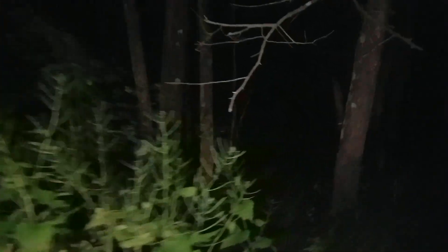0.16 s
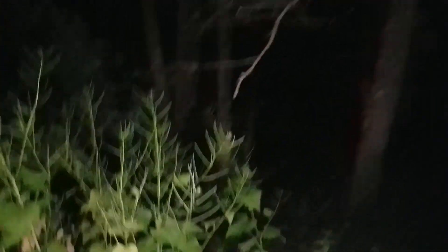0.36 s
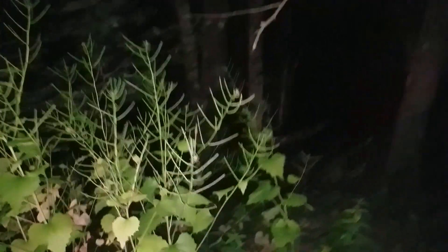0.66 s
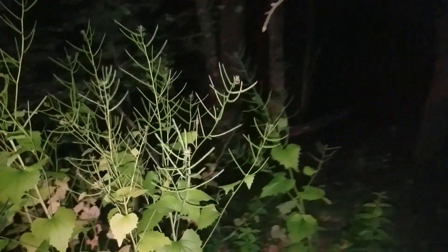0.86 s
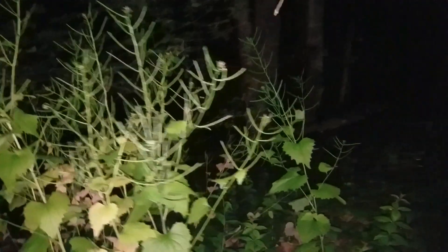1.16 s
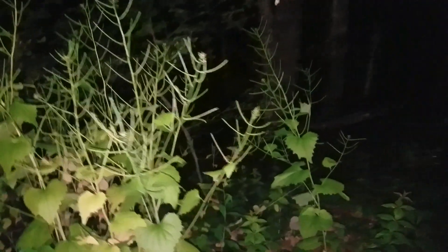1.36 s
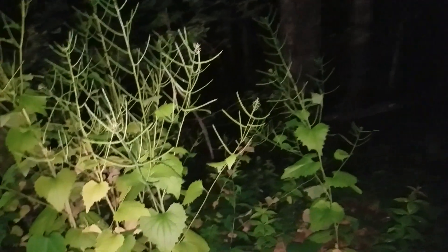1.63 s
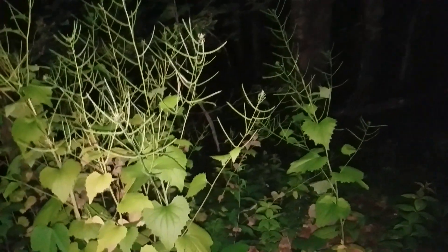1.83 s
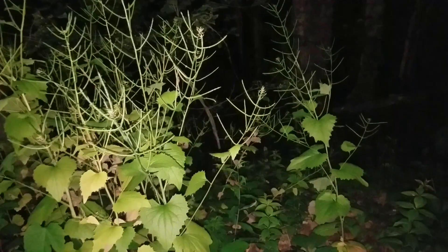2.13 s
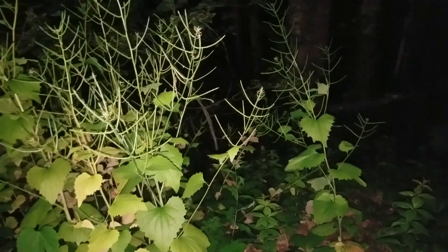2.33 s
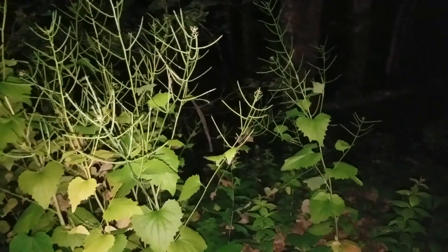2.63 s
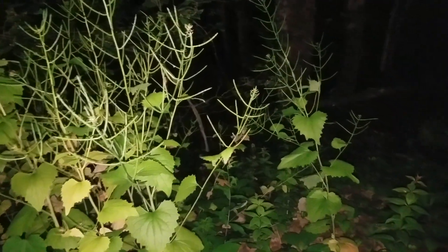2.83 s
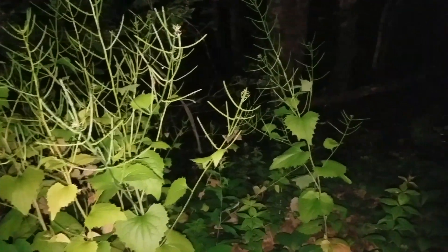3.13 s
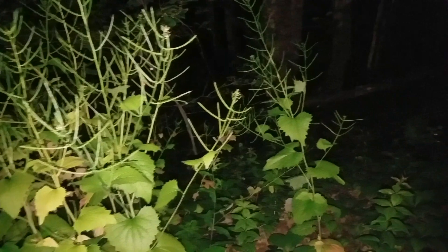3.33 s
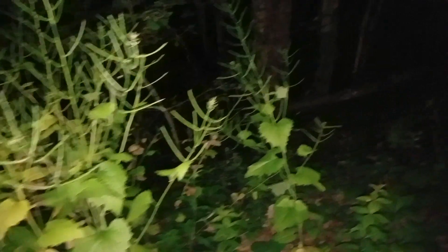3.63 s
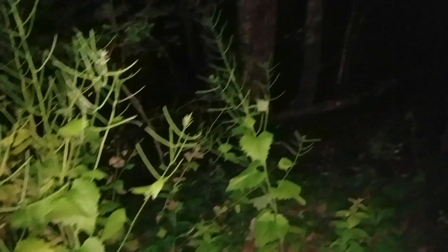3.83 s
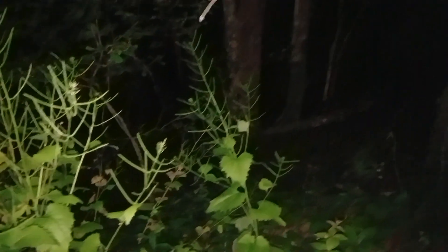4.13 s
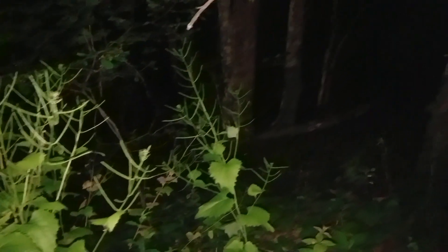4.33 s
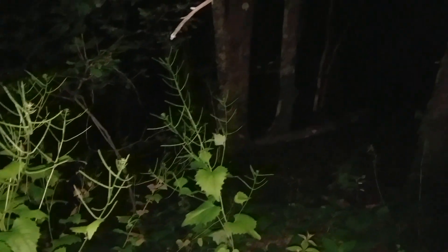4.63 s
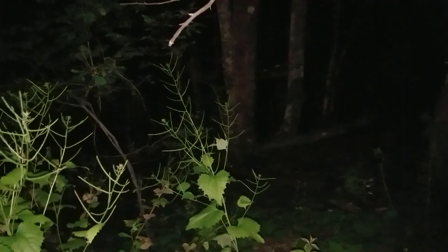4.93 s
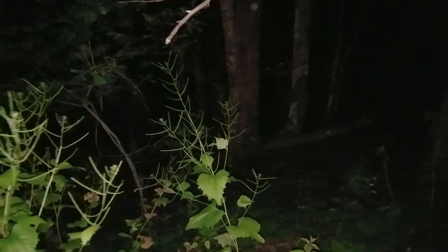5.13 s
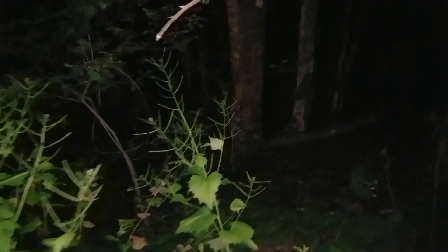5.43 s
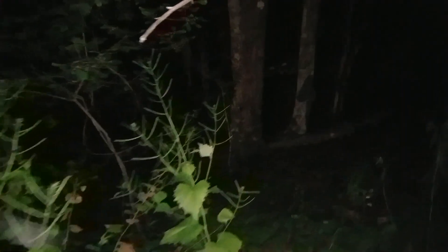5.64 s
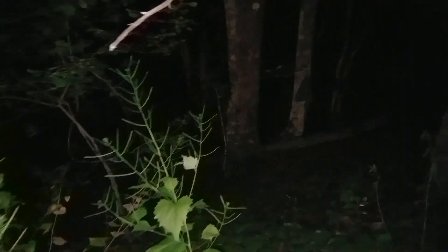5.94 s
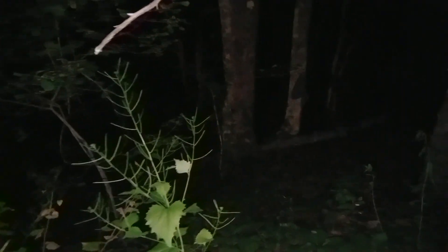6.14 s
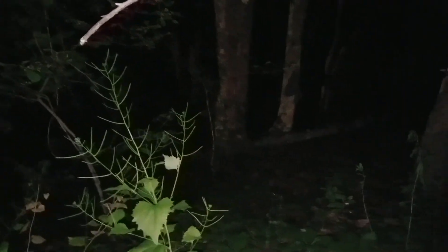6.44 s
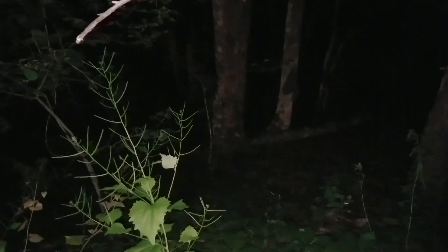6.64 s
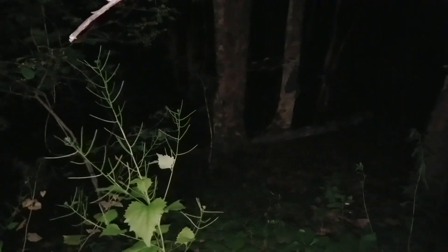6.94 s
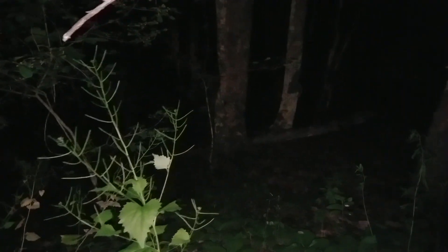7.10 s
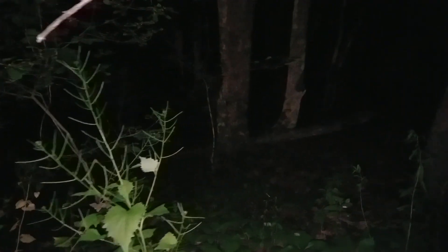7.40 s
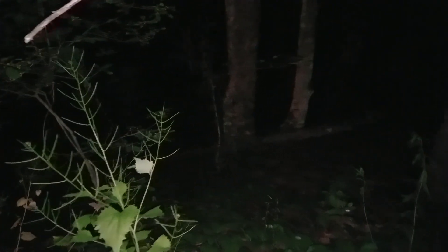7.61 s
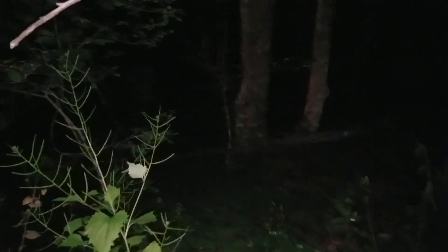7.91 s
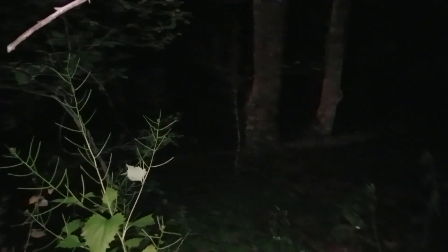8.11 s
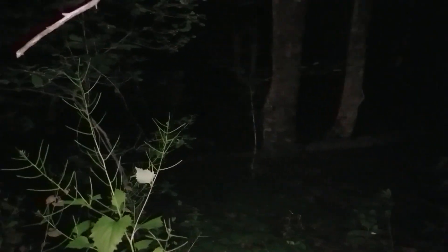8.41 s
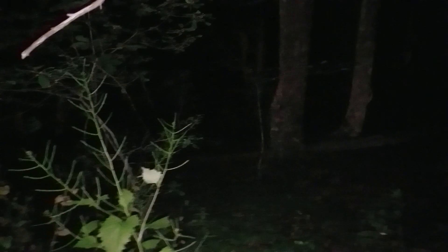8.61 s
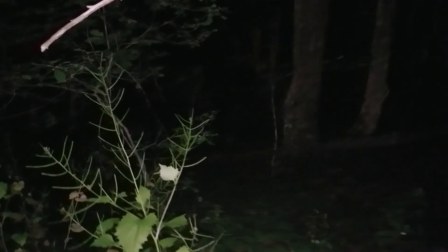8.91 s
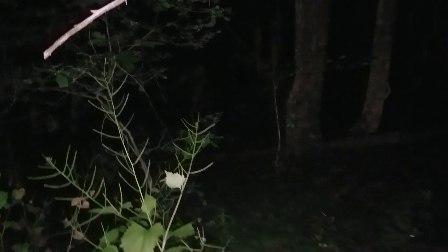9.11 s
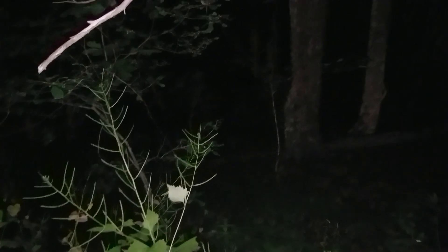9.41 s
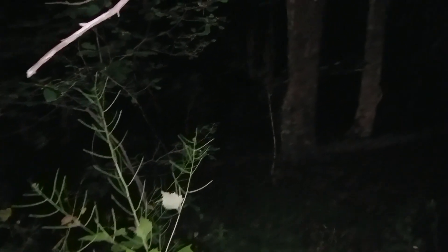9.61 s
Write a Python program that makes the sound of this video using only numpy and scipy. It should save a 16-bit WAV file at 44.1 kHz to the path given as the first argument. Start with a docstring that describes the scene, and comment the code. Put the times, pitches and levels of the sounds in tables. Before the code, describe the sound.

In a wood at night, several tree frogs trade brief pulsing trills that overlap and leave a long echo. Close to the hand-held microphone, leaves rustle, feet shift and twigs crack, mainly near the start, and a distant motor hums faintly. A light tap and then a sharp knock hit the microphone around the middle. Through the second half far traffic grows louder, its tyres singing a sinking note beneath the frogs.

```python
"""From the start, tree frogs trill over one another in a night wood, mostly to the right. Each trill
is a run of short rising notes that ring the frog's vocal sac, and tree trunks scatter a long echo.
In the first two seconds feet shuffle, leaves rustle and twigs snap, over a far motor's drone.
Something taps the hand-held microphone at 4.2 s and, much harder, at 5.6 s. From about 5 s to the
end, far traffic swells and its tyres sing a falling note, while the frogs and rustling go on."""
import sys
import numpy as np
from scipy import signal
from scipy.fft import rfft, irfft, next_fast_len
from scipy.io import wavfile

SR = 44100
rng = np.random.default_rng(int(sys.argv[2]) if len(sys.argv) > 2 else 0)


def wav_record(signal):
    """Record a signal, one row per channel, as 16-bit PCM in the file named by sys.argv[1]."""
    frames = np.transpose(np.atleast_2d(signal))
    bounded = np.clip(frames, -1, 1)
    # unit amplitude maps onto the largest positive 16-bit level
    quanta = np.round(bounded * 32767).astype(np.int16)
    wavfile.write(sys.argv[1], SR, quanta)


N = 430416
T = np.arange(N) / SR

# One frog trill a row: first_note_s, last_note_s, note_count, pitch_hz, level_db, voice
FROG_TRILLS = [ (-.022, 0.424, 10, 1089, -20, "high"), (.223, .727, 12, 1025, -21.5, "middle"),
               (0.466, 1.019, 14, 1178, -27, "high"), (.664, 1.114, 12, 950, -19, "crisp"),
               (.963, 1.432, 12, 942, -19, "low"), (1.488, 1.823, 9, 932, -10, "closest"),
               (1.508, 2.229, 17, 1068, -21.5, "high"), (1.779, 2.223, 11, 1004, -18.5, "middle"),
               (2.808, 3.498, 16, 1123, -22, "bright"), (2.921, 3.556, 16, 984, -18.5, "high"),
               (3.006, 3.559, 14, 1051, -19.5, "high"), (3.503, 3.9, 9, 1077, -25.5, "hollow"),
               (4.063, 4.552, 13, 944, -16.5, "low"), (4.945, 5.233, 8, 912, -16.5, "near"),
               (4.988, 5.82, 20, 1021, -19.5, "middle"), (5.157, 5.822, 16, 1071, -20.5, "hollow"),
               (6.132, 6.518, 10, 963, -15.5, "near"), (6.199, 6.866, 16, 1129, -24.5, "bright"),
               (6.244, 6.774, 13, 1082, -23.5, "high"), (6.825, 7.339, 13, 1026, -18, "crisp"),
               (7.701, 8.238, 14, 941, -16.5, "crisp"), (7.732, 8.233, 12, 1052, -18, "high"),
               (7.742, 8.239, 13, 1000, -25, "middle"), (8.18, 8.467, 7, 1054, -27.5, "hollow"),
               (8.87, 9.249, 10, 929, -14.5, "near"), (9.002, 9.753, 18, 1084, -24.5, "high"),
               (9.047, 9.742, 17, 1013, -22, "middle")]
# Each kind of voice: sac_width_hz, first_harmonic_db, third_harmonic_db, pan_db, echo_db
# (pan_db is always left minus right, so below zero means to the right)
FROG_VOICES = { "closest": (55, -18.5, -30, -14, -14.5), "bright": (110, -10, -20, -13.5, 1.5),
               "near": (101.5, -13.5, -27, -12.5, -6), "low": (63, -15.5, -19.5, -13, -0.5),
               "crisp": (92, -10.5, -23, -12, -3), "middle": (99, -12.5, -25.5, -17, -1),
               "high": (110.5, -13.5, -24.5, -16, -1.5), "hollow": (105.5, -8, -26.5, -15.5, 0)}
# Taps on the microphone's case: start_s, strength_db, pitch_hz, ring_s, pan_db
CASE_TAPS = [(4.1536, -5, 112.8, 0.0016, 24), (4.1543, -5.5, 605, 0.00047, 22),
             (5.58, 10.5, 1386, 0.00047, -10)]
# Stems and twigs snapping: start_s, peak_db, pitch_hz
TWIG_SNAPS = [(.232, -20, 905), (0.275, -25, 2500), (.411, -19, 1390), (0.445, -16, 1390),
              (.524, -18.5, 2170), (.583, -22, 15400), (1.131, -33, 4000), (1.154, -36, 4500),
              (1.201, -17, 2000), (1.216, -10.5, 1630), (1.321, -32, 5000), (1.568, -28, 7000),
              (1.931, -20, 2000), (2.142, -49, 9000), (2.195, -36, 5860), (2.224, -32, 3500),
              (4.944, -30, 4000), (5.63, -14, 1290), (5.811, -14, 1290), (5.833, -28.5, 3500),
              (6.966, -37.5, 4500), (7.864, -35, 5000), (8.235, -14, 1680), (9.249, -26.5, 3000),
              (9.288, -24, 2500)]
# Leaves brushing past: start_s, length_s, strength_db
LEAF_BRUSHES = [(.01, 0.056, -55.5), (0.157, .16, -55), (0.354, 0.61, -60), (0.976, 0.2, -59),
                (1.361, 0.049, -56), (1.507, 0.3, -49.5), (1.59, 0.029, -51.5), (1.847, 0.3, -63),
                (5.353, 0.48, -60.5), (7.697, .5, -61), (8.237, 0.25, -56.5), (9.196, .1, -69.5),
                (9.62, 0.17, -71)]
# Feet shifting in dead leaves: middle_s, half_length_s, level_db
FOOT_SHUFFLES = [(0.244, 0.25, -35.5), (0.444, 0.11, -66), (1.04, 0.14, -38.5), (1.224, 0.3, -47)]
# How loud the far traffic is: time_s, rumble_db, tyre_db
TRAFFIC_LEVELS = [(0, -59.5, -64), (2.6, -74, -67.5), (4.702, -60, -50.5), (6.001, -61, -45.5),
                  (7.5, -56, -41), (8, -50.5, -40), (8.698, -51.5, -39.5), (9.76, -45, -35.5)]
# The note that the tyres sing: time_s, pitch_hz, level_db
TYRE_WHINE = [(0, 640.7, -84), (4.8, 614.5, -69.5), (5.599, 592.7, -58.5), (7.001, 561.8, -52.5),
              (7.701, 508.5, -56), (8.501, 486, -54.5), (9.76, 470, -42)]
# How loud the far motor is: time_s, level_db
MOTOR_DRONE = [(0, -52), (.7, -59), (1.5, -51), (2.5, -57.5), (3.2, -48.5), (3.9, -55), (4.8, -68),
               (6.1, -56.5), (7, -63.5), (9.76, -70)]
# The tone of each noise, from bass to treble: frequency_hz, gain_db
LEAF_TONE = [(500, 3.5), (1500, 14.5), (3000, 9), (5000, 8.5), (7500, 6), (9000, -11.5), (12000, -3.5),
             (15500, 0.5)]
DEAD_LEAF_TONE = [(100, -15), (300, -9), (700, -4), (1400, 4), (3000, -5), (6000, -35), (12000, -39.5)]
RUMBLE_TONE = [(25, -25.5), (45, -10), (64, -4), (90, -7), (150, -22.5), (300, -16)]
TYRE_TONE = [(150, -13), (280, -12), (480, -6.5), (700, -4), (1100, -1), (1700, -3.5), (2800, -16),
             (5000, -42)]
NIGHT_TONE = [(25, -15.5), (60, -3.5), (100, 0), (170, -4.5), (330, -14), (700, -10), (1100, -10.5),
              (1600, -8), (2100, -5), (2800, -22.5), (4500, -31.5), (7500, -38.5), (9000, -44),
              (15000, -36)]


def frogs(soft_start_db=6, flat_start=0.029, slowing=0.035, scatter_db=1.6, waver=0.0063):
    """Each trill starts soft and a little low in pitch, and slows slightly as the frog tires."""
    out = np.zeros((2, N))
    for first_s, last_s, count, pitch_hz, level_db, voice in FROG_TRILLS:
        sac_width_hz, first_db, third_db, pan_db, echo_db = FROG_VOICES[voice]
        progress = np.arange(count) / (count - 1)
        times_s = (last_s - first_s) * (progress + slowing * progress * (progress - 1))
        trill = np.zeros(int((last_s - first_s + 0.1) * SR))
        for index, time_s in enumerate(times_s):
            cold = np.exp(-index)  # the frog warms up within a few notes
            level_luck, pitch_luck = rng.standard_normal(2)
            note_hz = pitch_hz * (1 - flat_start * cold + waver * pitch_luck)
            note_db = level_db - soft_start_db * cold + scatter_db * level_luck
            note = frog_note(note_hz, sac_width_hz, first_db, third_db)
            at = int(time_s * SR)
            trill[at:at + len(note)] += note * gain(note_db)
        start_s = first_s - len(note) / 2 / SR  # a note is timed by its middle
        direct = np.array([np.roll(trill, 10), trill])  # reaches the left side a little later
        echo = signal.fftconvolve(trill[None], wood_echo(), axes=1)
        add(out, direct * pan(pan_db), start_s)
        add(out, echo * pan(-7) * gain(echo_db), start_s)
    return out


def frog_note(pitch_hz, sac_width_hz, first_db, third_db, glide_per_s=10, rise_s=0.015, fall_s=0.013):
    """One rising note. Its second harmonic (twice the pitch) peaks as it rings the vocal sac."""
    t = np.arange(-1100, 1100) / SR
    hz = pitch_hz * (1 + glide_per_s * t)
    phase = 2 * np.pi * np.cumsum(hz) / SR
    swell = np.exp(-(t / np.where(t < 0, rise_s, fall_s)) ** 2)
    # the note's lowest tone is strongest near 1200 Hz and weaker below
    low_band_shape = resonance(hz, centre_hz=1201, width_hz=403)
    first = gain(first_db) * np.sqrt(swell) * np.sin(phase) * low_band_shape
    second = swell * np.sin(2 * phase) * resonance(hz, pitch_hz, sac_width_hz)
    # higher harmonics sound only at the height of the push; the top ones share a narrow resonance
    push = np.exp(-((hz - pitch_hz) / (0.78 * sac_width_hz)) ** 2)
    sheen = sum(np.sin(k * phase) * resonance(k * hz, centre_hz=7330, width_hz=1300) ** 2
                for k in range(6, 10))
    upper = np.sin(3 * phase) + gain(-18) * np.sin(4 * phase) + gain(-21) * sheen
    return first + second + gain(third_db) * upper * push


def wood_echo(trunks_per_s=500, trunks_fade_s=0.31, tail_fade_s=1.13, first_echo_s=0.009):
    """Near trunks send back separate echoes, and a dense tail lingers. Each fade is a 60 dB fall."""
    t = np.arange(SR) / SR
    trunks = normalise(rng.standard_normal((2, SR)) * (rng.random((2, SR)) < trunks_per_s / SR))
    # soft ground soaks up the low part of the call on the long paths
    tail = keep_band(rng.standard_normal((2, SR)), "highpass", hz=1500)
    echo = trunks * gain(-60 * t / trunks_fade_s) + tail * gain(-60 * t / tail_fade_s)
    return normalise(echo * (t > first_echo_s)) / np.sqrt(SR)


def microphone_taps(contact_s=0.00047):
    """Brief knocks ring the microphone's case and die almost at once."""
    out = np.zeros((2, N))
    t = np.arange(SR // 20) / SR
    for start_s, strength_db, pitch_hz, ring_s, pan_db in CASE_TAPS:
        rise = 1 - np.exp(-t / contact_s)
        ring = np.sin(2 * np.pi * pitch_hz * t) * rise * np.exp(-t / ring_s)
        knock = keep_band(ring, "highpass", hz=pitch_hz / 4)
        add(out, knock * gain(strength_db) * pan(pan_db), start_s)
    return out


def twig_snaps(snap_s=0.0012, widest_hz=5000, edge_db=-46):
    """A stem gives way with a tiny burst that makes it ring; higher snaps cover a wider band."""
    out = np.zeros((2, N))
    t = np.arange(SR // 30) / SR
    for start_s, peak_db, pitch_hz in TWIG_SNAPS:
        top_hz = pitch_hz + min(0.66 * pitch_hz, widest_hz) / 2
        band_hz = np.clip([pitch_hz ** 2 / top_hz, top_hz], 50, SR * 0.48)
        burst = rng.standard_normal((2, len(t))) * np.exp(-t / snap_s)
        ring = keep_band(burst, "bandpass", band_hz)
        body = ring / np.abs(ring).max() * gain(peak_db)
        brittle_edge = np.diff(burst, prepend=0) * gain(edge_db)  # as strong in every snap
        add(out, (body + brittle_edge) * pan(-9), start_s)
    return out


def leaf_rustle(catch_s=0.0083, release_s=0.023, stir_db=-73.5, most_clicks_per_s=4000, boost_db=5):
    """Leaves brush against clothing: a light touch gives single crackles, a hard one a dense rush."""
    pressure = np.full(N, gain(stir_db))  # between brushes the leaves barely stir
    for start_s, length_s, strength_db in LEAF_BRUSHES:
        catch = np.clip((T - start_s) / catch_s, 0, 1)
        release = np.exp(-np.maximum(T - start_s - length_s, 0) / release_s)
        pressure += gain(strength_db) * catch * release
    clicks = crackle(most_clicks_per_s * pressure / pressure.max(), spread_db=2)
    rustle = normalise(shape_tone(clicks, LEAF_TONE) * np.sqrt(pressure))
    level = np.sqrt(np.mean(pressure ** 2)) * gain(boost_db)
    return rustle * level * pan(-7)


def foot_shuffles():
    """Dead leaves crunch as feet shift their weight on them."""
    weight = sum(gain(level_db) * np.exp(-((T - middle_s) / half_length_s) ** 2)
                 for middle_s, half_length_s, level_db in FOOT_SHUFFLES)
    crunch = shape_tone(crackle(clicks_per_s=500, spread_db=3.5), DEAD_LEAF_TONE)
    return crunch * weight * pan(-6)


def far_traffic():
    """Traffic draws nearer on a far road: engines rumble and hum, and tyres roar."""
    times_s, rumble_db, tyre_db = np.transpose(TRAFFIC_LEVELS)
    rumble_level = gain(np.interp(T, times_s, rumble_db))
    tyre_level = gain(np.interp(T, times_s, tyre_db))
    rumble = wide_noise(RUMBLE_TONE, spread=0.16, pan_db=-9.5) * wobble(turns_per_s=12)
    roar = wide_noise(TYRE_TONE, spread=0.14, pan_db=-8) * wobble(turns_per_s=26)
    engine = far_hum(pitch_hz=62.2, width_hz=7.3) * gain(-8.5) * pan(-5)
    return (rumble + engine) * rumble_level + roar * tyre_level


def tyre_whine():
    """Tyres sing on the far road, sinking in pitch as they grow louder."""
    times_s, pitch_hz, level_db = np.transpose(TYRE_WHINE)
    whine = far_hum(np.interp(T, times_s, pitch_hz), width_hz=49)
    return whine * gain(np.interp(T, times_s, level_db)) * pan(-6.5)


def motor_drone():
    """A far motor holds one low note that swells and fades."""
    times_s, level_db = np.transpose(MOTOR_DRONE)
    return far_hum(pitch_hz=195.6, width_hz=48) * gain(np.interp(T, times_s, level_db)) * pan(-7)


def night_hush(level_db=-47):
    """The soft, nearly steady hush of the night."""
    return wide_noise(NIGHT_TONE, spread=0.092, pan_db=-5.5) * gain(level_db) * wobble(turns_per_s=5.8)


def crackle(clicks_per_s, spread_db, tail_s=0.0022):
    """Tiny clicks of very unequal size, each with a short noisy tail."""
    sizes = gain(spread_db * np.minimum(rng.exponential(size=N), 5))
    clicks = sizes * (rng.random(N) < clicks_per_s / SR)
    tails = signal.lfilter([1], [1, -np.exp(-1 / (tail_s * SR))], clicks)
    return tails * rng.standard_normal((2, N))


def far_hum(pitch_hz, width_hz):
    """A far tone, blurred into a narrow band on its way."""
    blur = keep_band(rng.standard_normal((2, N)), "lowpass", hz=width_hz / 2)
    phase = 2 * np.pi * np.cumsum(pitch_hz * np.ones(N)) / SR
    return normalise(blur[0] * np.cos(phase) + blur[1] * np.sin(phase))


def wide_noise(tone, spread, pan_db):
    """Noise from all around: the bass sits in the middle, the treble is wide and leans to one side."""
    middle, side = rng.standard_normal((2, N))
    side = keep_band(side, "highpass", hz=500, order=1) + spread * rng.standard_normal(N)
    stereo = np.array([middle + side, middle - side])
    bass = keep_band(stereo, "lowpass", hz=250, order=1)
    return shape_tone(bass * pan(0) + (stereo - bass) * pan(pan_db), tone)


def wobble(turns_per_s, depth_db=0.5):
    """A gain that drifts a little up and down at random."""
    drift = np.interp(T * turns_per_s, np.arange(1000), rng.standard_normal(1000))
    return gain(depth_db * drift)


def resonance(hz, centre_hz, width_hz):
    """How strongly something rings: fully at its centre, much less to either side."""
    return 1 / np.hypot(1, (2 * (hz - centre_hz) / width_hz) ** 2)


def shape_tone(sound, tone):
    """Filter a sound to follow a tone table, then bring its average level to one."""
    points_hz, points_db = np.transpose(tone)
    size = next_fast_len(N)
    hz = np.maximum(np.fft.rfftfreq(size, 1 / SR), 1)
    curve = gain(np.interp(np.log(hz), np.log(points_hz), points_db))
    fade_ends = np.minimum(hz / points_hz[0], 1) * np.minimum(points_hz[-1] / hz, 1) ** 2
    return normalise(irfft(rfft(sound, size) * curve * fade_ends, size)[..., :N])


def keep_band(sound, kind, hz, order=2):
    """Keep what lies below (lowpass), above (highpass) or between (bandpass) the given hz."""
    return signal.sosfilt(signal.butter(order, hz, kind, fs=SR, output="sos"), sound)


def gain(db):
    """Turn decibels into a number to multiply by."""
    return 10 ** (np.asarray(db) / 20)


def normalise(sound):
    """Scale to an average level (rms) of one."""
    return sound / np.sqrt(np.mean(sound ** 2) + 1e-20)


def pan(pan_db):
    """Left and right gains with a total power of one."""
    gains = gain([[pan_db], [0]])
    return gains / np.sqrt(np.sum(gains ** 2))


def add(out, sound, start_s):
    """Mix a stereo sound in at a given time."""
    at = int(start_s * SR)
    begin, end = max(at, 0), min(at + sound.shape[1], N)
    out[:, begin:end] += sound[:, begin - at:end - at]


def scene():
    """The frogs, the small sounds close by and the far background."""
    foreground = frogs() + microphone_taps() + twig_snaps() + leaf_rustle() + foot_shuffles()
    return foreground + far_traffic() + tyre_whine() + motor_drone() + night_hush()


def record(dry, low_cut_hz=30, high_cut_hz=15900):
    """The microphone loses the deepest bass and the recorder cuts the highest treble."""
    thinned = keep_band(dry, "highpass", low_cut_hz)
    return signal.sosfilt(signal.ellip(10, 0.2, 80, high_cut_hz, fs=SR, output="sos"), thinned)


dry = scene()
out = record(dry)
wav_record(out)
```